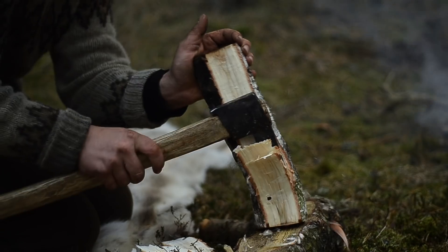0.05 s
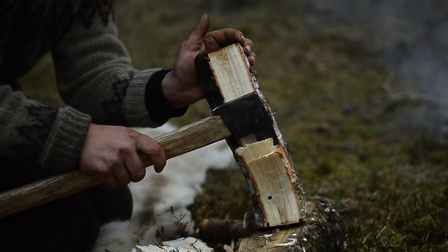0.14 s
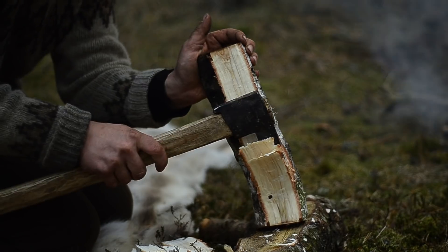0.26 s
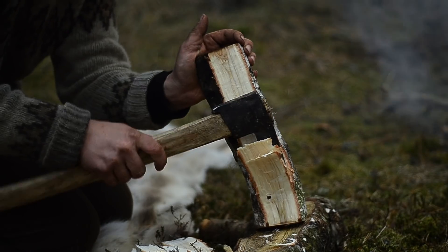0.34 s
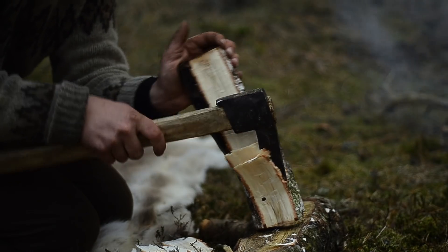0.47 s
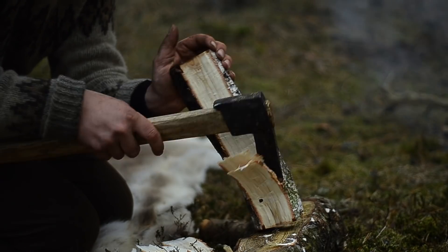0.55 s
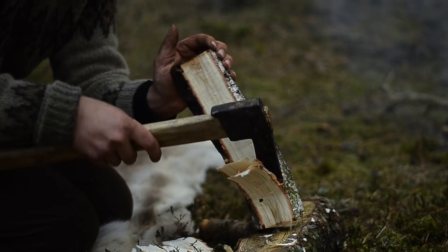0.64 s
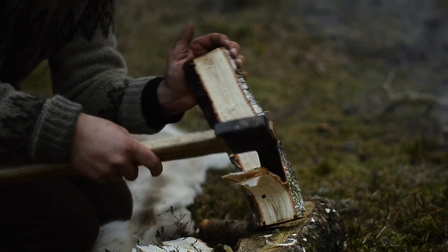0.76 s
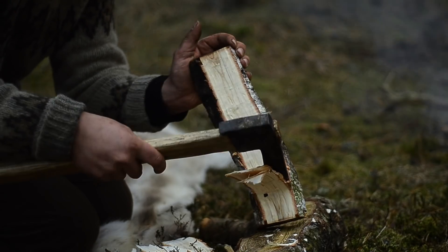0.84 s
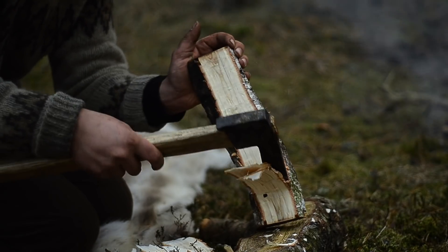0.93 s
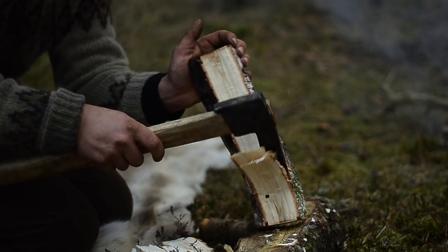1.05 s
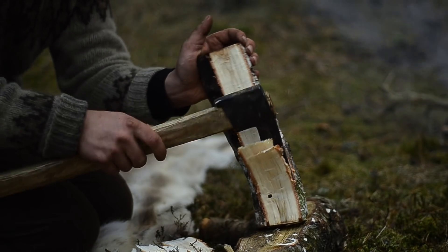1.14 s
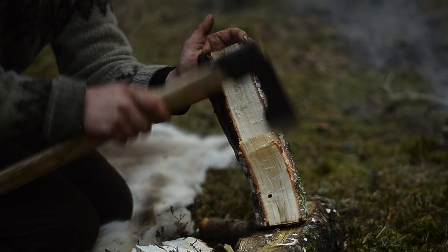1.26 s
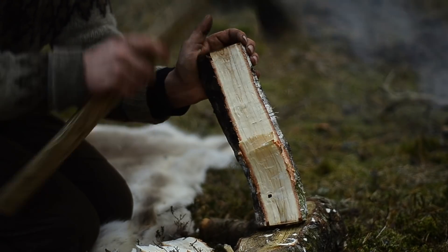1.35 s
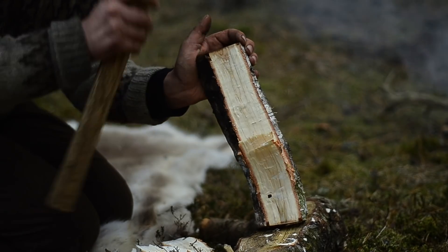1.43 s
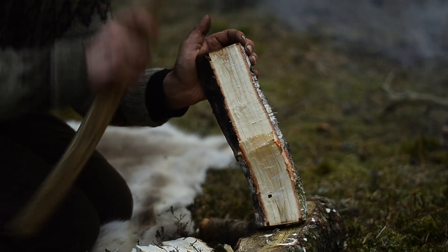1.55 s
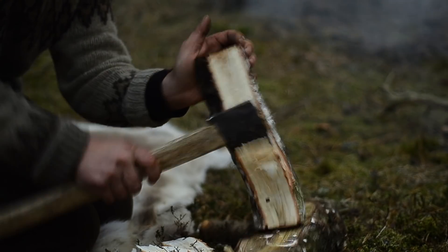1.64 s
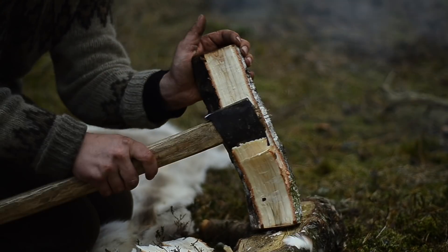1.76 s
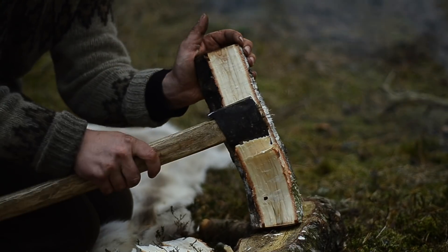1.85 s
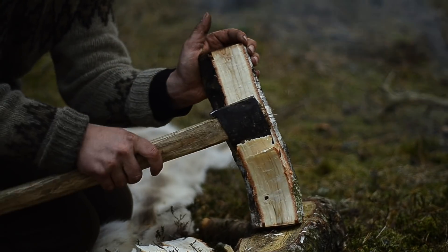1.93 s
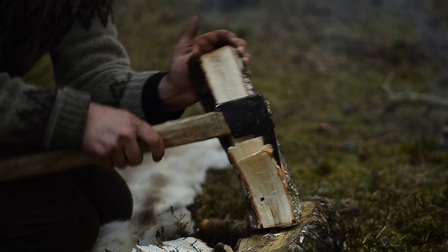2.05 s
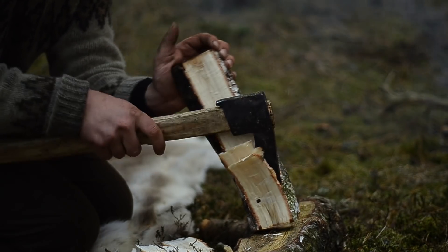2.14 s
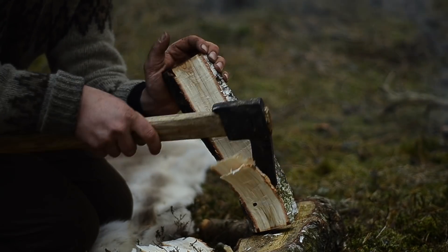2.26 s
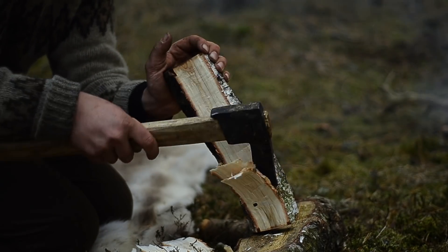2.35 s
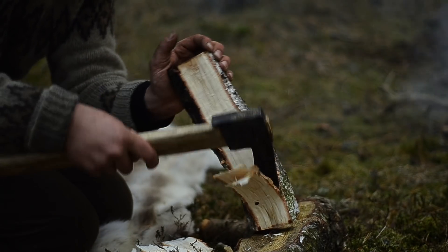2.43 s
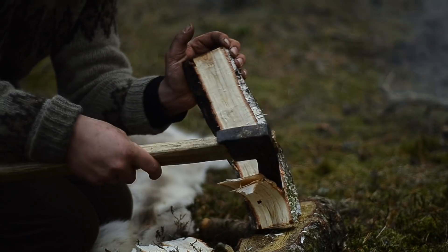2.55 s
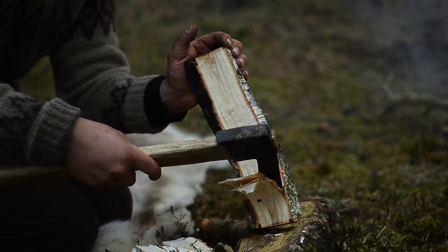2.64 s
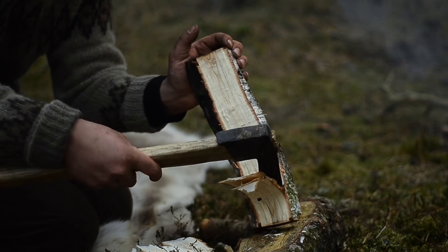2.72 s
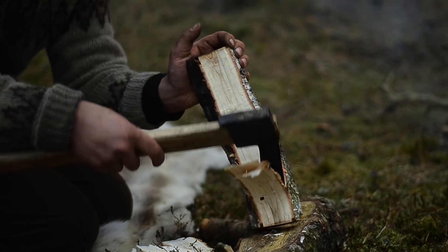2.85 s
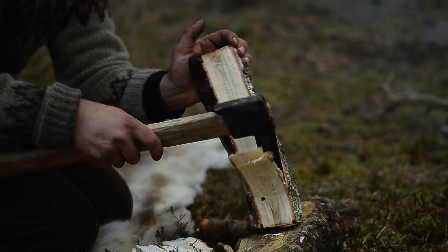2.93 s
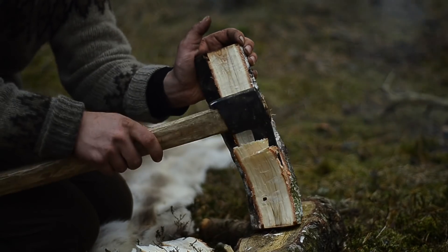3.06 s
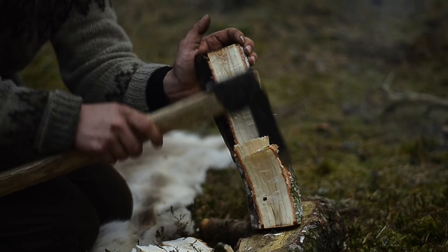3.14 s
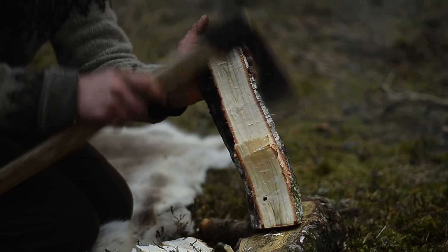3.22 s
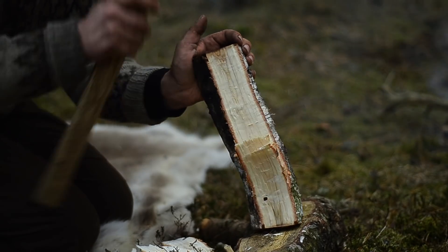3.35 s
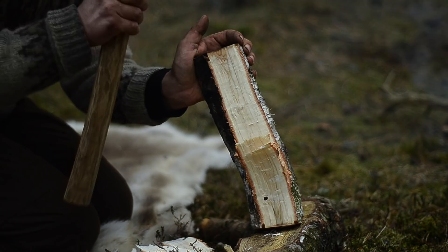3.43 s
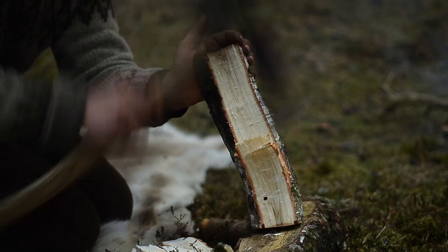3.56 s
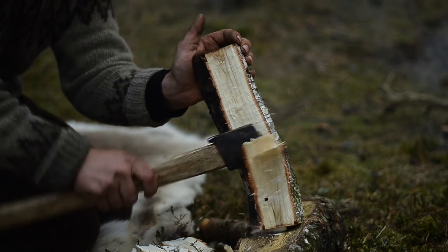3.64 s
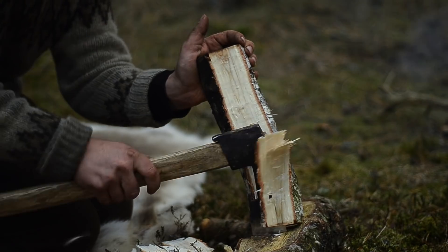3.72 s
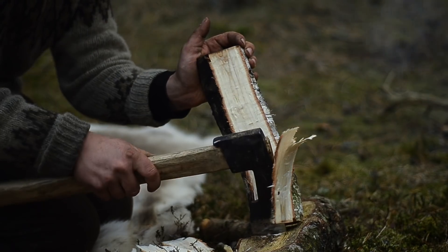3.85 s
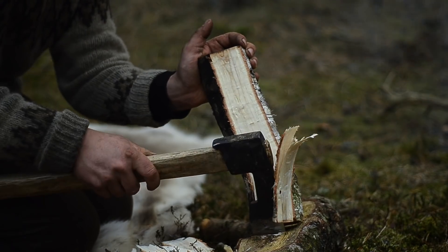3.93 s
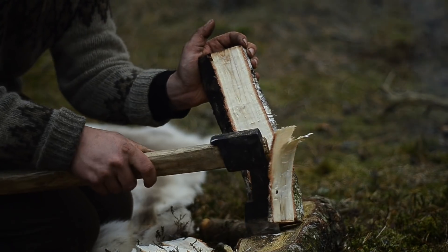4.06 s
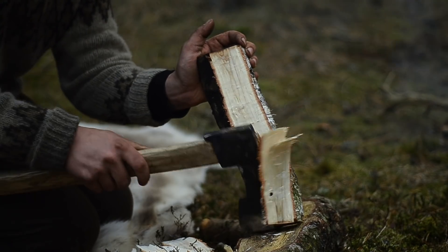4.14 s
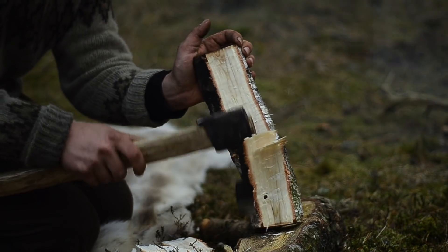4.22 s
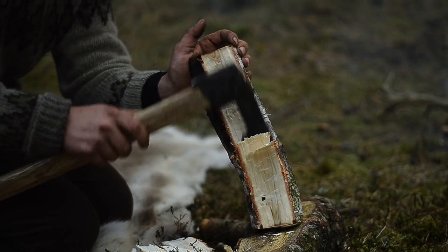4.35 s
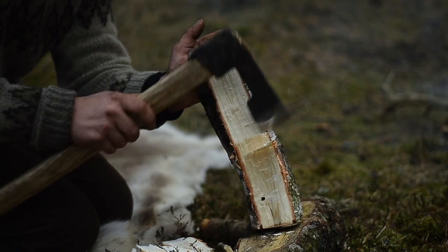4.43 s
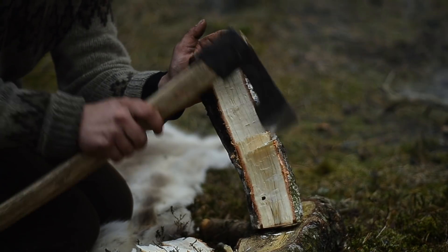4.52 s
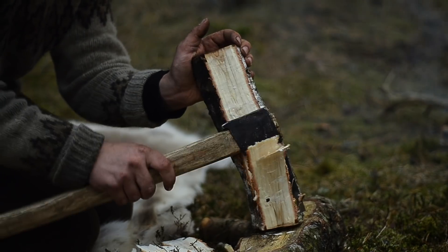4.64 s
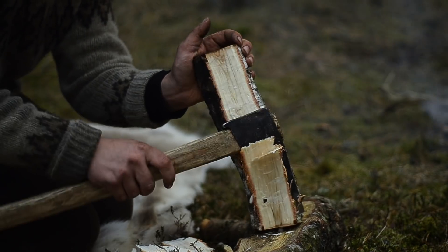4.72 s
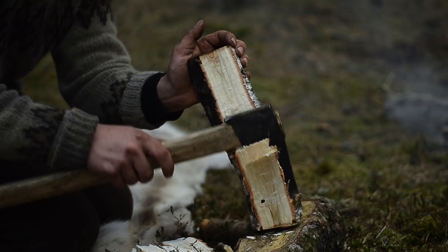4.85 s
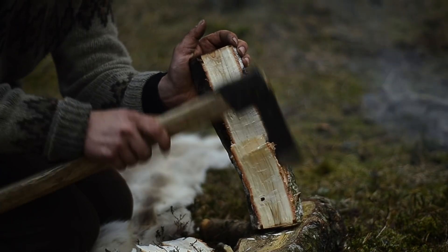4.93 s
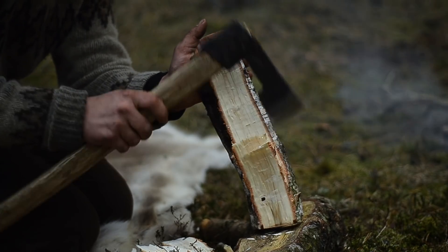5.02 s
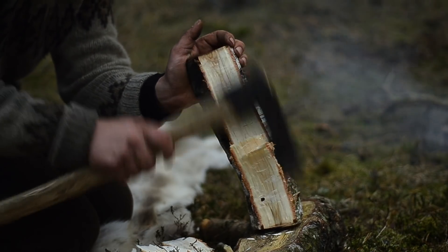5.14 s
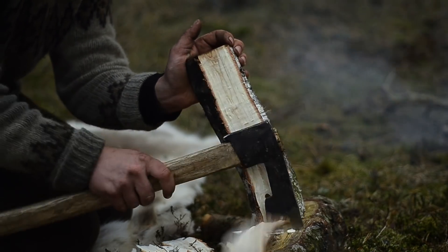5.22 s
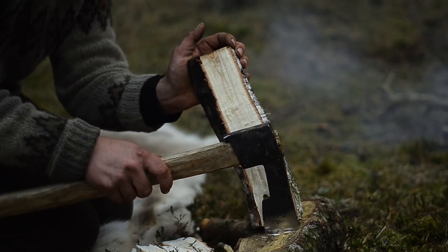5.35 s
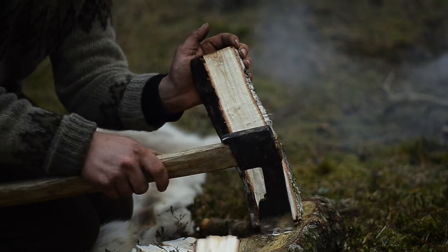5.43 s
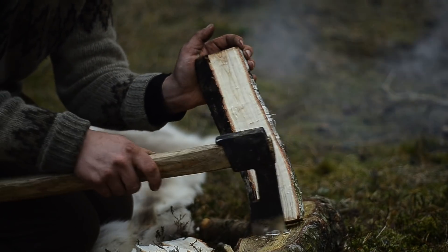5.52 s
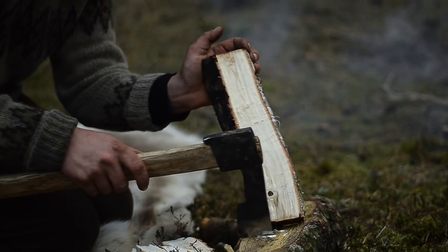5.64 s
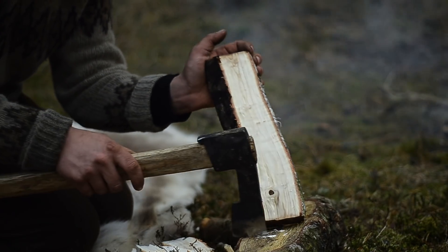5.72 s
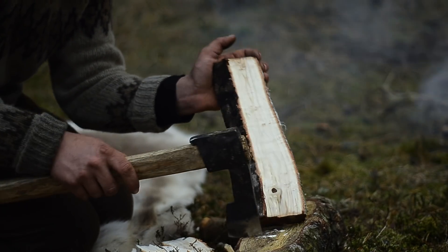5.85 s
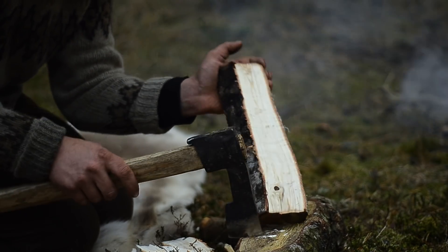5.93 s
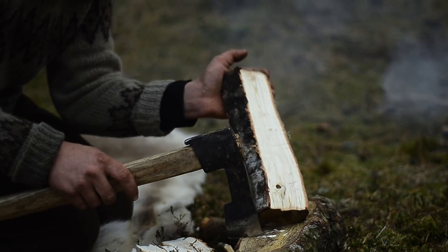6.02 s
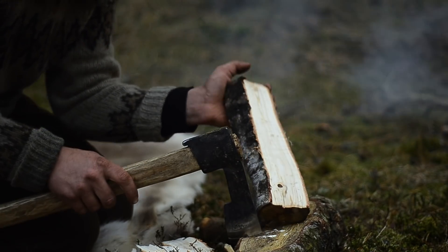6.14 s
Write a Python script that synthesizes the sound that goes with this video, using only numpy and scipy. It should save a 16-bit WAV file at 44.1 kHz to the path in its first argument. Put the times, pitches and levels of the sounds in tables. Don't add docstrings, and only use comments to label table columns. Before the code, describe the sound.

Close-up axe work on a standing log: sharp hollow chops, splintering snaps and levered scrapes, short echoes from trees, faint still air.

```python
import sys
import numpy as np
from scipy import signal
from scipy.io import wavfile
from scipy.ndimage import uniform_filter1d

SR = 44100
rng = np.random.default_rng(int(sys.argv[2]) if len(sys.argv) > 2 else 0)


def bounce(signal):
    frames = np.transpose(np.atleast_2d(signal))
    limited = np.clip(frames, -1, 1)
    pcm = np.round(limited * 32767).astype(np.int16)
    wavfile.write(sys.argv[1], SR, pcm)


def boost_factor(decibels):
    exponent = np.asarray(decibels, float) / 20
    return 10 ** exponent


N = 272538


def evened(x):
    return x / np.sqrt(np.mean(x ** 2) + 1e-20)


def read(points, hz):
    f, value = np.transpose(points)
    return np.interp(np.log(hz + 1), np.log(f + 1), value)


def add(mix, s, sound):
    part = mix[max(round(s * SR), 0):][:len(sound)]
    part += sound[:len(part)]


def colour(x, points):
    log_gain = np.log(boost_factor(read(points, abs(np.fft.fftfreq(4096, 1 / SR)))))
    taps = np.fft.ifft(np.exp(np.conj(signal.hilbert(log_gain)))).real[:2048]
    return signal.oaconvolve(x, taps)[:len(x)]


def filtered(x, order, hz, kind):
    return signal.sosfilt(signal.butter(order, hz, kind, fs=SR, output="sos"), x)


def ring(hz, t60, size=4096):
    t = np.arange(size) / SR
    swell = 1 - np.exp(-t * hz * 3)
    return boost_factor(-60 * t / max(t60, 1e-3)) * np.sin(2 * np.pi * hz * t) * swell


def struck(modes, contact_ms):
    body = sum(boost_factor(db) * ring(hz, t60) for hz, db, t60 in modes)
    t = np.arange(128) / SR * 1000 / contact_ms
    body = np.convolve(body, np.sin(np.pi * np.minimum(t, 1)))
    return body / abs(body).max()


def shake(level_db):
    t = np.arange(SR // 2) / SR
    wobble = filtered(rng.standard_normal(len(t)), 2, [22, 65], "bandpass")
    return boost_factor(level_db - 60 * t / .5) * evened(wobble) * np.minimum(t / 0.016, 1)


def grit(size, per_s, spread_db):
    chance, height, sign = rng.random((size, 3)).T
    clicks = (chance < per_s / SR) * boost_factor(-spread_db * np.log(height + 0.0041))
    return evened(clicks * np.sign(sign - .5))


# (time [s], blow level [dB], tearing level [dB], tearing t60 [s], ground shake [dB])
BITES = [
    (.0014, 6, -10, 0.065, -39),
    (1.7032, 9.5, -5.5, 0.05, -41),
    (3.6594, 13.5, -1.5, .045, -46.5),
]
# (pitch [Hz], t60 [s], level at blow 1, 2, 3 [dB])
LOG_NOTES = [(69, 0.061, -20.5, -20.5, -20.5), (352, 0.038, -17, -11.5, -13.5), (471, 0.048, -17, -17, -13),
             (590, 0.064, -13, -15, -13), (770, 0.049, -12, -17.5, -17), (870, 0.039, -16, -15, -18.5),
             (1000, 0.056, -8, -13, -14), (1100, 0.02, -6, -5, -6.5), (1227, 0.029, -1.5, -2, 0),
             (1362, 0.02, -6.5, -2, -0.5), (1650, 0.041, -8, -6, -7), (1830, 0.048, -9.5, -9, -5),
             (2226, 0.034, -8, -12, -3.5), (2353, 0.014, -3, -7, -6.5), (2526, 0.042, -9, -7, -7.5),
             (2900, .04, -9.5, -11, -9), (3100, 0.056, -14, -13, -10), (4030, 0.039, -19, -16.5, -16),
             (4270, 0.031, -21, -15.5, -19.5)]
GRIP_SHARE = [.9, 0.84, .8]
# (pitch [Hz], level [dB])
TEAR_COLOUR = [(200, -25.5), (700, -5), (1500, -3), (2500, -3.5), (4500, -8), (8000, -17.5), (15600, -24.5)]


def bites():
    wood, ground = np.zeros((2, N))
    t = np.arange(8192) / SR
    for k, (s, db, tear_db, tear_t60, shake_db) in enumerate(BITES):
        modes = [(hz, levels[k], GRIP_SHARE[k] * t60) for hz, t60, *levels in LOG_NOTES]
        add(wood, s, boost_factor(db) * struck(modes, contact_ms=0.18))
        tearing = evened(colour(grit(len(t), per_s=5000, spread_db=4.0), TEAR_COLOUR))
        add(wood, s, boost_factor(tear_db - 60 * t / tear_t60) * tearing)
        add(ground, s, shake(shake_db))
    return wood, ground


# (time [s], blow level [dB], contact [ms], ground shake [dB])
LANDINGS = [
    (.4308, -30, 0.13, -76),
    (3.682, -5.5, 0.82, -47),
    (3.6841, 3.5, 0.94, -51),
    (5.2624, 5.5, 0.73, -45.5),
    (5.3609, -21, 1, -73.5),
    (0.091, -29.5, 1, -80),
]
# (pitch [Hz], level [dB], t60 [s])
STUMP_NOTES = [(213, -35, 0.02), (347, -12.5, 0.051), (433, 0, 0.016), (522, -1.5, 0.025),
               (770, -9.5, 0.008), (1015, -1, 0.055), (1140, -12, 0.045), (1020, 7, 0.024),
               (1600, -18, 0.027), (2500, -17, .02)]


def landings():
    stump, ground = np.zeros((2, N))
    for s, db, contact_ms, shake_db in LANDINGS:
        add(stump, s, boost_factor(db) * struck(STUMP_NOTES, contact_ms))
        add(ground, s, shake(shake_db))
    return filtered(stump, 1, 90, "highpass"), ground


# (time [s], level [dB], pitch [Hz], t60 [s],
# swell [ms])
BOOMS = [(.0015, 6, 1270, .014, .4), (.0025, 2, 2350, .012, .8), (1.712, -17, 300, .04, 3),
         (.0055, 3, 840, .024, 2.2), (.013, -10.5, 365, 0.028, 3), (1.7052, 12, 855, .018, 2),
         (1.712, -19.5, 884, .11, 4), (1.7031, -16.5, 105, 0.047, .6), (1.709, -8, 1666, 0.026, 1.7),
         (1.7031, -3, 4660, .012, .4), (1.7038, -1, 2700, .012, .4), (1.712, -22, 2500, .08, 3),
         (3.6635, 13, 790, .019, 2.9), (3.674, -14, 400.9, .03, 2.2), (5.2615, -6, 357.3, .028, 1),
         (.009, -7, 1035, 0.041, 1.5), (4.6565, -20.5, 568, 0.069, 1), (4.668, -25, 370, 0.07, 3.6),
         (4.688, -27.5, 600, 0.053, 4), (5.2186, -5.5, 600, 0.0085, 0.28), (5.2395, -15, 450, .01, .5),
         (5.275, -29, 370, .09, 4), (5.652, -39.5, 366, 0.073, 2), (3.6655, -4, 2290, 0.024, 1)]


def booms():
    out, t = np.zeros(N), np.arange(4096) / SR
    for s, db, hz, t60, swell_ms in BOOMS:
        add(out, s, boost_factor(db) * ring(hz, t60) * (1 - np.exp(-1000 * t / swell_ms)))
    return out


# (time [s], level [dB], pitch [Hz], second pitch [Hz], its level [dB])
KNOCKS = [
    (2.132, -38.5, 1403, 349.6, 1.5),
    (4.282, -34, 354, 544.2, -0.5),
    (4.928, -40, 495, 1000, -11.5),
    (5.2215, -26, 584, 355, -8),
]
# (time [s], level [dB], pitch [Hz], second pitch [Hz], its level [dB])
SLAPS = [(1.92, -36, 1100, 698.6, -9), (5.244, -15, 910, 1694, 0), (5.249, -8, 485, 1000, -10),
         (0.7718, -14, 770, 485, -24), (0.8323, -26.5, 710, 1102, 7.5), (2.541, -27, 634, 880, -24),
         (3.8934, -31.5, 620, 1080, 12), (4.654, 1.5, 815, 520, 0.5), (5.3608, -13.5, 620, 302.4, 3),
         (5.4221, -22.5, 620, 906, -29), (5.6465, -11.5, 606, 366, -5.5)]
# (pitch [Hz], level [dB])
RUB_COLOUR = [(300, -9.5), (520, -14.5), (1000, -13.5), (1700, 0), (2300, -1.5), (3000, -5), (3700, -5),
              (5200, -16), (8300, -24), (15600, -22)]


def knocks_and_slaps():
    out, t = np.zeros(N), np.arange(8192) / SR
    for rows, t60 in ((KNOCKS, 0.048), (SLAPS, 0.0081)):
        for s, db, hz, second_hz, second_db in rows:
            rattle = evened(colour(grit(len(t), per_s=4500, spread_db=-1.5), RUB_COLOUR))
            add(out, s, boost_factor(db - 24.5 - 60 * t / 0.011) * rattle)
            notes = ring(hz, t60) + boost_factor(second_db) * ring(second_hz, 0.32 * t60)
            add(out, s, boost_factor(db) * notes)
    return filtered(out, 2, 240, "highpass")


# (pitch [Hz], level [dB])
CRACK_COLOUR = [(1000, -28.5), (4000, -7.5), (7800, -1.5), (10000, -10.5), (13000, -9.5), (16000, -24)]


def snaps(rows):
    out, t = np.zeros(N), np.arange(1024) / SR
    for s, db, hz, crack_db in rows:
        noise = rng.standard_normal((2, len(t)))
        near = np.array([.7, 1.35, 1.8]) * rng.uniform(0.79, 1.3, 3)
        sharp = np.clip((crack_db + 35.5) / 22, 0, 1)
        t60 = .011 - 0.0072 * sharp
        splinter = (1 - 0.31 * sharp) * ring(hz, t60, size=1024)
        splinter += 2.0 * sharp * ring(1.1 * hz, 0.0011, size=1024)
        for ratio, way in zip(near, (-1, -1, 1)):
            splinter += 0.32 * sharp * way * ring(min(hz * ratio, 5400), t60, size=1024)
        splinter *= 1 - np.exp(-t / (0.00025 * (1 - sharp) + 1 / SR))
        crack = colour(noise[0] * boost_factor(-60 * t / 0.0065), CRACK_COLOUR)
        crack *= boost_factor(crack_db + 2.5) / abs(crack).max()
        fuzz = boost_factor(-17.0 + 7.8 * sharp - 60 * t / 0.011) * evened(colour(noise[1], RUB_COLOUR))
        add(out, s, boost_factor(db) * (1.5 * splinter + crack + fuzz))
    return filtered(out, 2, 700, "highpass")


# (start [s], end [s], peak level [dB])
CREAKS = [
    (0.668, 0.683, -47.5),
    (1.159, 1.27, -46),
    (5.99, 6.04, -51.5),
    (2.54, 2.572, -47),
    (4.145, 4.187, -60),
    (4.82, 4.87, -49.5),
]


def creaks(count):
    low_hz, high_hz = 1800, 4600
    rows = []
    for start, end, db in CREAKS:
        place, size, tone = rng.random((count, 3)).T
        s = start + (end - start) * (np.arange(count) + place) / count
        rows += zip(s, db - 6 * size, low_hz * (high_hz / low_hz) ** tone)
    return rows


# (time [s], peak level [dB], splinter pitch [Hz])
SLIPS = [(.1729, -37.5, 1384), (.4305, -28, 1860), (.4325, -33.5, 2900), (.4512, -36, 1318),
         (1.0651, -46, 2126), (1.2455, -49.5, 2263), (1.8184, -38, 1140), (2.107, -40, 2760),
         (2.4816, -31, 2030), (2.6653, -38, 1100), (3.0146, -42.5, 2004), (3.3282, -42, 2512),
         (3.653, -36.5, 2002), (3.679, -10.5, 1900), (3.71, -26.5, 2450), (3.7408, -19, 2040),
         (3.7438, -17.5, 1830), (3.7813, -25, 1830), (3.7972, -19, 1830), (3.839, -33, 4350),
         (3.9296, -29, 1640), (4.0064, -30, 1640), (4.2814, -33.5, 2064), (4.3499, -32.5, 1930),
         (4.656, -15, 2310), (4.8003, -33, 1623), (5.212, -33, 2273), (5.2375, -15, 2070),
         (5.344, -27, 3350), (5.5497, -41.5, 2160)]
# (time [s], peak level [dB], splinter pitch [Hz])
SNAPS = [(.0164, -26, 3520), (.032, -25, 2600), (.687, -23.5, 2200), (.7716, -24, 2150), (.7732, -12, 3300),
         (.838, -34, 1760), (.7894, -27.5, 4030), (1.6895, -17, 2687), (1.6939, -9.5, 3200),
         (1.718, -21.5, 2193), (2.1042, -27, 2210), (2.4677, -38, 1880), (2.4923, -33.5, 2950),
         (2.5399, -11.5, 2170), (2.5443, -21, 2670), (3.0934, -48, 3070), (3.7746, -23.5, 1934),
         (3.7857, -20, 1830), (3.8117, -31.5, 1740), (3.8275, -17, 1880), (3.8955, -26.5, 2198),
         (4.2065, -38, 1837), (4.3853, -33.5, 1960), (5.2203, -21.5, 1700), (5.2623, -19, 2310),
         (5.3183, -19, 1450), (5.33, -24, 2500), (5.3367, -27, 3200), (5.3624, -22, 1350),
         (5.6478, -25, 1140)]
# (time [s], peak level [dB], splinter pitch [Hz])
BREAKS = [(.043, -32, 2387), (.048, -36, 2440), (.3039, -56, 1210), (.7421, -24.5, 1900),
          (.7437, -33, 2480), (1.083, -45, 3980), (.8345, -27, 1300), (.8724, -45, 1790),
          (1.743, -35.5, 4457), (2.3823, -41.5, 4920), (2.403, -39.5, 3140), (2.4636, -41, 3220),
          (2.4941, -34, 3310), (2.5125, -42.5, 4700), (2.5221, -30.5, 1940), (2.5328, -22.5, 1948),
          (2.5354, -22, 2040), (2.5423, -13, 3270), (2.5747, -45, 1106), (2.6028, -27, 3930),
          (2.6348, -23.5, 4500), (2.6924, -46.5, 3000), (2.7225, -40, 2990), (2.7465, -37, 3100),
          (3.0246, -49, 4500), (3.8345, -28, 1427), (4.7305, -39.5, 1608), (4.8778, -35.5, 4030),
          (5.4212, -27, 1110), (5.785, -53, 4390)]


def fibres():
    kinds = (SLIPS, -30), (SNAPS, -14.5), (BREAKS, -0.5), (creaks(count=4), -12)
    return snaps([(*row, crack_db) for rows, crack_db in kinds for row in rows])


# (time [s], peak level [dB], splinter pitch
# [Hz], crack over the ring [dB])
TICKS = [(.305, -38, 1218, -23), (.366, -50, 980, -28), (1.691, -21, 1292, -28), (1.7, -23, 3300, -25),
         (1.731, -22.5, 2620, -29.5), (2.413, -41, 3000, -22), (2.4185, -49, 4000, 1),
         (2.431, -52, 4800, 0), (2.454, -54, 4000, -6), (2.4725, -49, 2500, -2), (2.482, -30, 3170, -12.5),
         (2.5175, -42, 3000, 1), (2.527, -45.5, 4600, -2), (2.555, -37, 1800, -16), (2.563, -43, 4500, 7),
         (2.59, -47, 3000, -4), (2.618, -48, 4800, 2), (2.689, -43.5, 1200, -29), (3.687, -14.5, 2700, -28),
         (3.825, -23, 3050, -19), (3.8392, -32, 2607, -12), (4.0728, -48, 1395, -17),
         (4.1132, -41.5, 1600, -11), (4.262, -37, 1100, -31), (4.2688, -44, 1580, -29),
         (4.292, -49, 5230, 3.5), (4.3292, -41, 2190, -22), (4.333, -45.5, 4000, 2),
         (4.402, -41.5, 2730, -12), (4.4719, -48, 2290, -20), (4.4923, -47, 1700, -24.5),
         (4.5255, -53, 3000, 3), (4.6713, -14, 1977, -20), (4.6775, -19, 2310, -7),
         (4.6855, -19, 2500, -13), (5.46, -41, 2000, -15), (5.488, -40, 3500, -13.5),
         (5.54, -50.5, 4600, -2), (5.69, -53, 5000, 6), (5.8986, -51, 1500, -24),
         (5.9325, -42.5, 1773, -24), (5.969, -56, 5000, -1), (5.9769, -46, 1932, -27),
         (6.0962, -46.5, 1680, -24), (3.0942, -29, 2302, -22), (5.2612, -7.5, 2500, -29),
         (5.253, -13, 3300, -18), (.7722, -24, 3300, -16.5), (1.173, -51, 3400, -14),
         (1.27, -46, 2650, -25),
         (0.02, -24, 2900, -12), (.027, -28, 3700, -10), (0.057, -32, 2700, -21.5),
             (.066, -36, 3000, -11), (.0705, -31.5, 2300, -28), (1.74, -32, 1100, -14),
             (1.7455, -31.5, 1500, -26), (1.754, -34, 2500, -26), (5.2398, -19, 1730, -28.5),
             (5.2525, -18, 1800, -28), (4.7316, -38.5, 2400, -30.5), (3.0979, -40, 2000, -20),
             (3.106, -44, 2300, -25), (5.3375, -24, 3300, -30.5), (5.395, -44, 3000, -3),
             (.849, -40, 3300, -22), (3.711, -28, 1050, -32), (.043, -30, 1050, -32)]


def ticks():
    return snaps(TICKS)


# (time [s], peak level [dB], lowest pitch [Hz], highest pitch [Hz])
CLICKS = [(0.4305, -38, 900, 5000), (.687, -32, 1510, 9000), (0.742, -27, 1500, 9060),
          (0.7717, -2, 1500, 6460), (0.8332, -20, 2200, 6500), (2.1036, -24, 1500, 6000),
          (1.6939, -6, 1800, 5500), (2.5438, -16, 2500, 12960), (2.6029, -23, 3300, 14100),
          (2.635, -13.5, 4200, 14540), (3.0937, -11.5, 1530, 4200), (3.8277, -19, 2000, 7900),
          (3.8343, -30, 3480, 9000), (5.2444, -8.5, 600, 2500), (5.2604, -5.5, 500, 3500),
          (1.7048, 2, 10000, 15000)]


def clicks():
    out, impulse = np.zeros(N), np.zeros(4096)
    impulse[0] = 1
    for s, db, low_hz, high_hz in CLICKS:
        click = filtered(impulse, 2, [low_hz, high_hz], "bandpass")
        add(out, s, boost_factor(db) * click / abs(click).max())
    return out


# (start [s], length [s], level [dB], main pitch [Hz])
JOLTS = [
    (.772, 0.15, -43, 3540),
    (1.69, 0.051, -21.5, 2990),
    (2.534, 0.14, -48, 3040),
    (3.673, 0.098, -25, 2320),
    (4.131, 0.6, -57.5, 1388),
    (4.727, 0.049, -47, 2390),
    (5.22, 0.059, -40, 4500),
    (5.319, 0.03, -36.5, 3300),
    (5.422, 0.11, -43.5, 2500),
]
# (start [s], length [s], level [dB], main pitch [Hz])
DRAGS = [(.452, 0.095, -45, 2840), (2.139, 0.17, -50, 2009), (4.27, 0.23, -55.5, 1996),
         (4.657, 0.066, -26, 2500), (4.905, 0.18, -45, 3200), (5.235, 0.023, -27, 1800),
         (5.243, 0.034, -20.5, 4140), (5.323, 0.053, -38.5, 3340), (5.362, 0.075, -44.5, 3000),
         (5.47, 0.44, -60, 2560), (6.07, 0.19, -62, 1900)]
# (start [s], length [s], level [dB], main pitch [Hz])
SWEEPS = [(.47, .17, -51, 1780), (1.05, .21, -64, 1900), (1.225, 0.081, -55.5, 2693),
          (1.285, 0.067, -56.5, 3000), (2.105, 0.061, -44, 1600), (2.381, 0.27, -58, 3026),
          (2.845, .14, -56.5, 1800), (2.935, .155, -60.5, 1900), (3.12, 0.12, -59, 2200),
          (3.29, 0.07, -56.5, 1672), (3.785, 0.1, -46.5, 1930), (3.885, 0.11, -52, 1270),
          (4.235, .075, -52.5, 1200), (4.45, .08, -59, 1800), (4.852, 0.037, -49.5, 1800),
          (4.94, 0.089, -40.5, 1800), (4.955, .075, -42, 2900), (5.01, 0.073, -55, 1708),
          (5.625, 0.054, -44.5, 2980), (5.876, 0.2, -57, 1900)]
# (pitch [Hz], level [dB])
PATCHES = [(600, -17), (1100, -16), (1700, -2), (2300, -11), (3000, -5), (3700, -11), (4600, -10),
           (5200, -16.5)]
# (pitch [Hz], level [dB])
FINE_GRIT = [(7300, -19.5), (8300, -17), (9000, -19), (11000, -20.5), (13500, -25.5)]


def rub(start_peak, hold, length, db, main_hz):
    t = np.arange(0, length, 1 / SR)
    bright_db = 4 + 16.5 * min(np.log2(main_hz / 1900), 0) - 0.2 * (db + 49.5)
    patches = [(main_hz, 0)] + PATCHES + [(hz, gain_db + bright_db) for hz, gain_db in FINE_GRIT]
    rasp = np.zeros(len(t))
    for hz, gain_db in patches:
        plucks = grit(len(t), per_s=1500, spread_db=3.5)
        note = signal.oaconvolve(plucks, ring(hz, 9 / hz, size=512))[:len(t)]
        rasp += boost_factor(gain_db) * evened(note)
    away = np.interp(t, [0, start_peak * length, length], [1, 0, 1])
    return boost_factor(db - 32 * away ** hold) * evened(rasp)


def rubbing():
    out = np.zeros(N)
    for rows, peak, hold in ((JOLTS, 0.016, 1.3), (DRAGS, 0.212, 2), (SWEEPS, .51, 2.5)):
        for start, length, db, main_hz in rows:
            add(out, start, rub(peak, hold, length, db, main_hz))
    return out


# (time [s], level [dB], pitch [Hz])
SLIDE = [
    (5.46, -65.5, 2110),
    (5.55, -62.5, 1975),
    (5.59, -50, 1980),
    (5.62, -46, 2015),
    (5.645, -63, 2050),
    (5.69, -58, 2090),
    (5.73, -62.5, 2090),
    (5.78, -58.5, 2103),
    (5.83, -69, 2093),
]
# (pitch ratio [x], width [Hz], level [dB])
HEAD_NOTES = [(1, 75, 0), (1.63, 110, -20), (2.22, 110, -18), (4.37, 130, -18)]


def singing_head():
    out = np.zeros(N)
    s, db, pitch = np.transpose(SLIDE)
    t = np.arange(s[0], s[-1], 1 / SR)
    slips, song = grit(len(t), per_s=1600, spread_db=3.0), np.zeros(len(t))
    for ratio, width, mode_db in HEAD_NOTES:
        turn = np.exp(2j * np.pi * np.cumsum(ratio * np.interp(t, s, pitch)) / SR)
        kept = np.exp(-np.pi * width / SR)
        song += boost_factor(mode_db) * evened((turn * signal.lfilter([1], [1, -kept], slips / turn)).real)
    add(out, s[0], boost_factor(np.interp(t, s, db)) * song * signal.windows.tukey(len(t), .1))
    return out


# (time [s], level [dB])
PINGS = [
    (4.656, -32.5),
    (5.2187, -39),
    (5.2505, -20.5),
    (5.2633, -24),
]
# (pitch [Hz], level [dB], t60 [s])
STEEL_NOTES = [(4490, 0, 0.045), (3300, -13, .08), (6760, -17.5, 0.056), (8480, -8.5, 0.035),
               (9350, -9, 0.032), (11440, -13.5, .04)]


def pings():
    out = np.zeros(N)
    for s, db in PINGS:
        add(out, s, boost_factor(db) * struck(STEEL_NOTES, contact_ms=.05))
    return out


# (pitch [Hz], t60 [s])
TREE_DECAY = [(200, 0.18), (800, 0.48), (2500, 0.27), (5000, 0.28), (10000, 0.069)]


def trees(x):
    taps = np.zeros(SR // 2)
    at = np.arange(200, len(taps) - 20, 20)
    taps[at + rng.integers(0, 20, len(at))] = rng.choice([-1., 1.], len(at))
    clumps = evened(uniform_filter1d(rng.standard_normal(len(taps)), size=250))
    taps *= boost_factor(1.6 * clumps)
    hz, t, z = signal.stft(taps, SR, nperseg=256)
    tail = signal.istft(z * boost_factor(-60 * t / read(TREE_DECAY, hz)[:, None]), SR, nperseg=256)[1]
    return signal.fftconvolve(x, tail / np.linalg.norm(tail))[:N]


# (time [s], level [dB])
FRONTS = [
    (0.0018, 2.5),
    (1.704, 8),
    (3.66, 4),
    (5.262, -8),
    (4.655, -13),
    (1.4, -30),
    (1.8, -30),
    (4.3, -26),
]
# (pitch [Hz], level [dB])
SCATTER_COLOUR = [(200, -18), (900, -0.5), (1400, -2.5), (1900, -1), (2600, 2.5), (3600, -6), (4900, -4),
                  (9000, -20)]


def echo(near):
    fronts = np.zeros(N)
    for s, db in FRONTS:
        add(fronts, s, np.array([boost_factor(db)]))
    return trees(colour(fronts, SCATTER_COLOUR) + boost_factor(-36) * near)


# (pitch [Hz], level [dB])
AIR_COLOUR = [(20, -14), (50, -9.5), (100, -3.5), (210, -0.5), (400, -8.5), (800, -12), (1800, -18),
              (4000, -23.5), (8000, -32), (12500, -28.5), (15600, -33.5)]


def air():
    frames, hz = N // 256 + 5, np.fft.rfftfreq(1024, 1 / SR)
    a, b, patches = rng.standard_normal((frames, 513, 3)).T
    patches = evened(uniform_filter1d(uniform_filter1d(patches, 10, 0), 12, 1))
    depth_db = 1.47 + 0.42 * np.exp(-hz / 500)
    z = (a + 1j * b) * boost_factor(read(AIR_COLOUR, hz)[:, None] + depth_db[:, None] * patches)
    return boost_factor(-55.5) * evened(signal.istft(z, nperseg=1024, noverlap=768)[1][:N])


def scene():
    wood, bite_ground = bites()
    stump, landing_ground = landings()
    near = wood + stump + booms() + knocks_and_slaps()
    near += fibres() + clicks() + rubbing() + singing_head() + pings()
    return (near + echo(near) + bite_ground + landing_ground + ticks() + air())[None]


def top_cut(x):
    return signal.sosfilt(signal.butter(12, 15700, fs=SR, output="sos"), x)


# (pitch [Hz], level [dB])
MIC_COLOUR = [(5000, -1), (5500, -4.5), (5750, -13), (6050, -3.5), (6900, -3), (7600, 0), (8400, 2.5),
              (9200, -3.5), (10200, -7.5), (12500, -7.5), (15500, -8.5), (15800, -30.5)]


def record(dry):
    x = colour(dry[0], MIC_COLOUR)
    return top_cut(np.clip(x, -1, 1)[None])


dry = scene()
out = record(dry)
bounce(out)
```